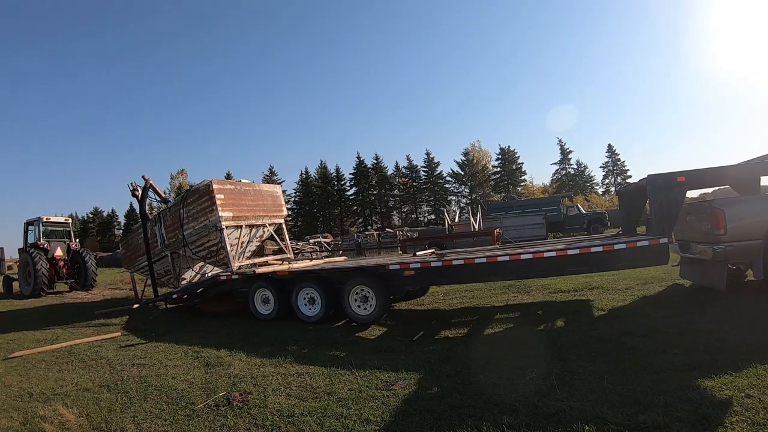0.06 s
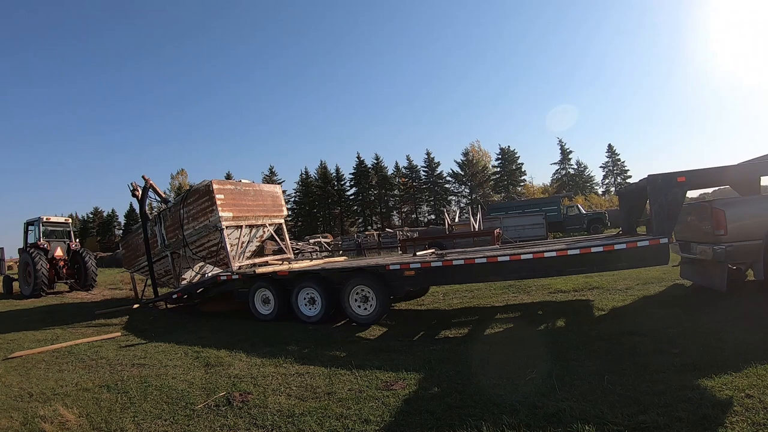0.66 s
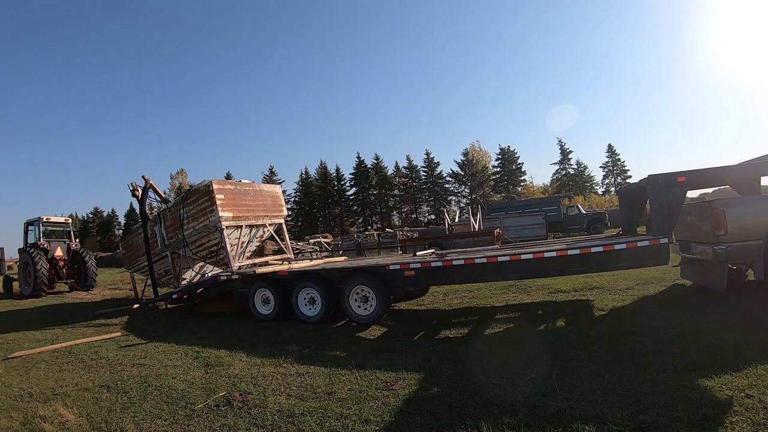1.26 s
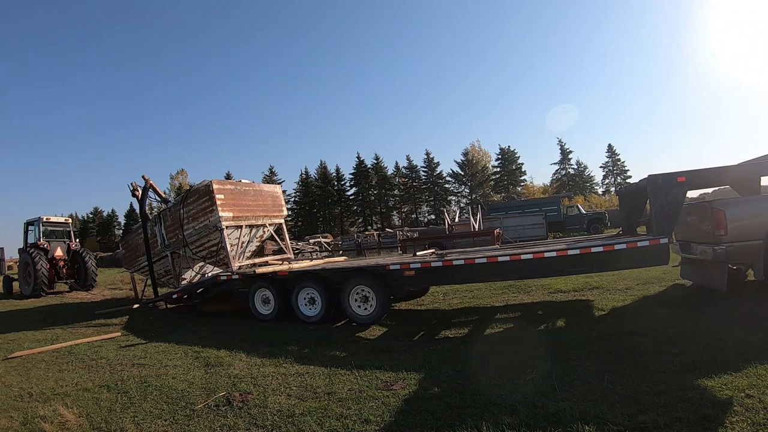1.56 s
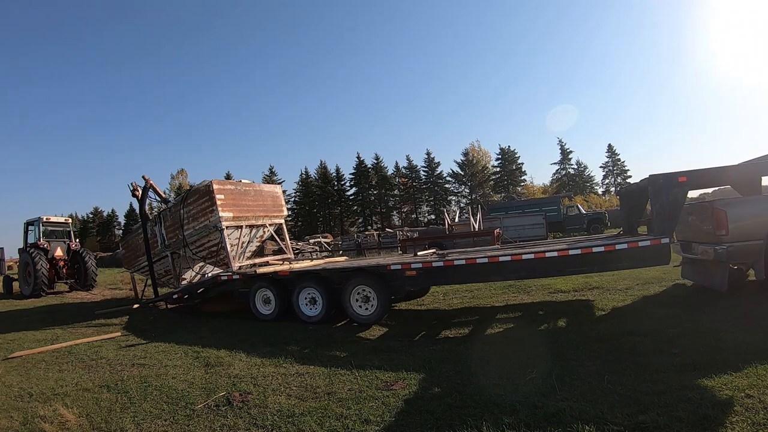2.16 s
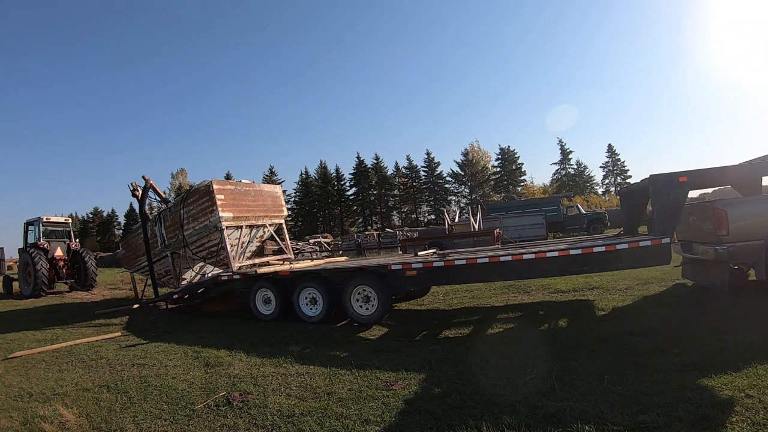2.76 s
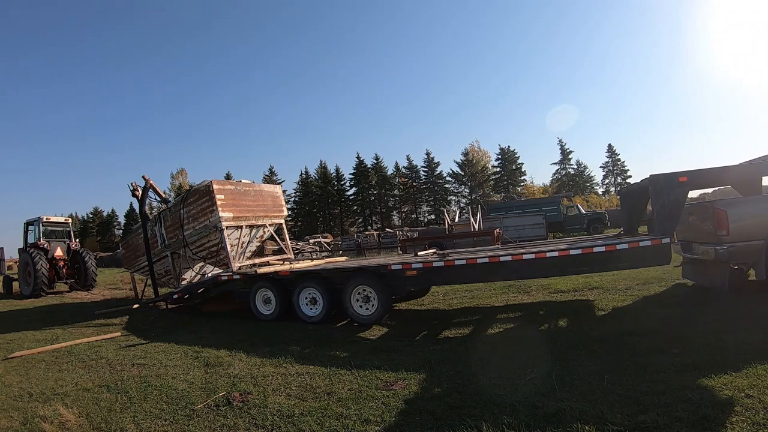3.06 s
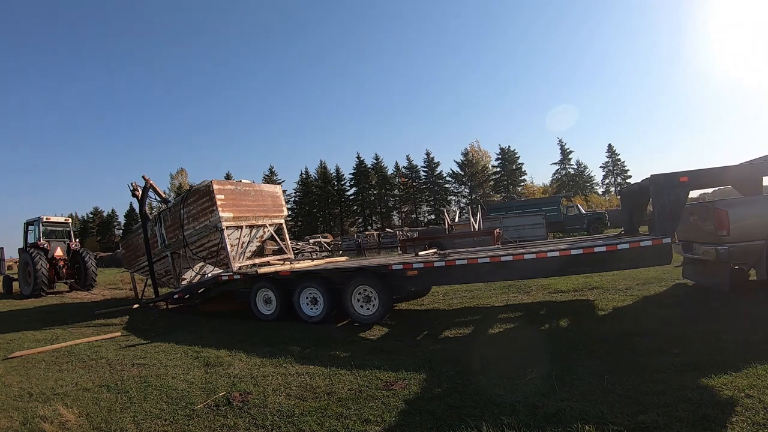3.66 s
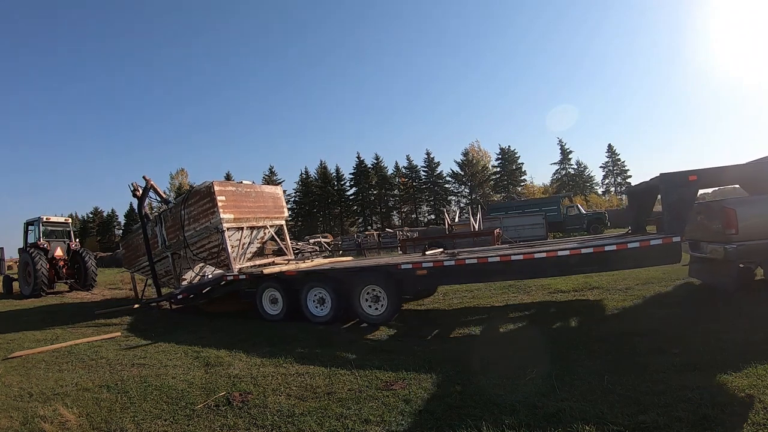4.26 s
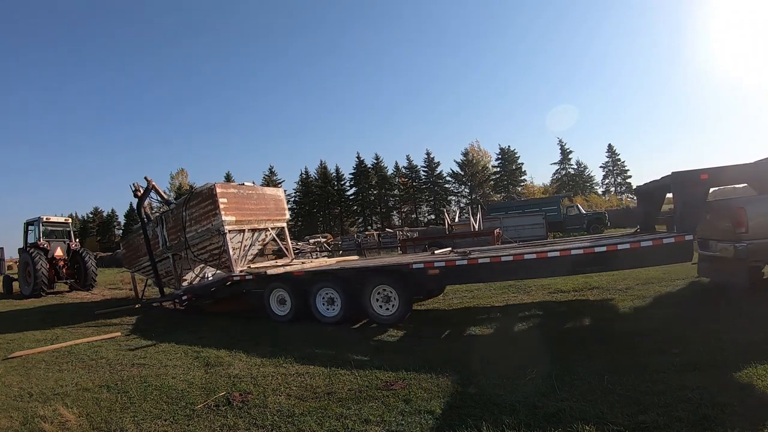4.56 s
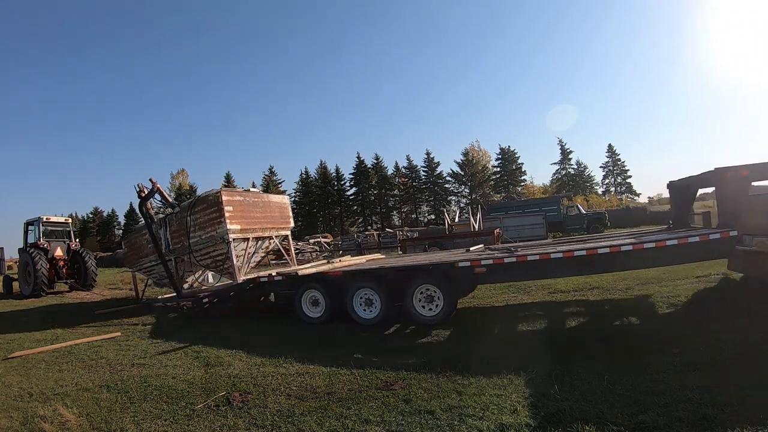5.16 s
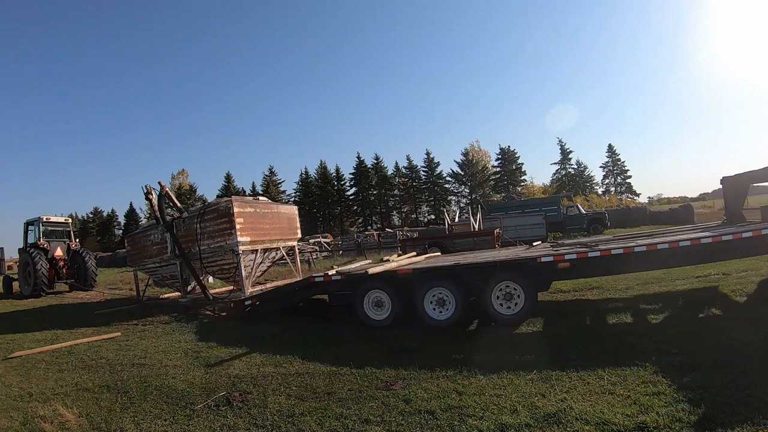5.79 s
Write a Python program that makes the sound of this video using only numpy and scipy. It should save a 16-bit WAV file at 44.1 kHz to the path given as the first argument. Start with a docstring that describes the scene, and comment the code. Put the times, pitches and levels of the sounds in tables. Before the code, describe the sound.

A six-cylinder diesel pickup runs near the microphone in an open farmyard, knocking and rattling its panels over a low rumble. Its pitch climbs steadily for the first four seconds, with a faint hiss of air. A flatbed trailer thumps dully as its load shifts, hardest at about 1.2 to 1.5 seconds, and wooden skids crunch briefly near 0.3, 2 and 3.6 seconds. From about 3 seconds the exhaust swells into a deep boom. Just after 4 seconds a wooden tank gives short groans, followed by a quick run of sharp timber knocks and cracks from 4.4 to 4.8 seconds. The engine eases slightly and the boom drops away around 5.2 seconds. The tank then starts scraping down the deck in gritty judders with brief squeals, growing louder with the rumble until the end, near 5.8 seconds.

```python
"""An open farmyard, one microphone near a six-cylinder diesel pickup with a tilted flatbed trailer.
The truck revs up, each cylinder knocking in its own way and rattling the panels, and starts to pull
the trailer out from under a wooden grain tank; the bed thumps and the skids crunch over a low rumble.
From about 3 s the exhaust booms as it takes the load. Past 4 s the tank's timbers groan, knock and
crack, and from 5 s they start to scrape down the deck."""
import sys
import numpy as np
from scipy import signal
from scipy.fft import rfft, irfft, next_fast_len
from scipy.io import wavfile
from scipy.ndimage import uniform_filter1d

SR = 44100
rng = np.random.default_rng(int(sys.argv[2]) if len(sys.argv) > 2 else 0)


def digitize_waveform(pressure):
    """Quantize a signal to 16-bit integers and store it at the path in sys.argv[1].

    Rows of a 2-D input are taken as channels; values are limited to [-1, 1].
    """
    field = np.atleast_2d(pressure).T
    bounded = np.clip(field, -1, 1)
    quanta = np.round(bounded * 32767).astype(np.int16)
    wavfile.write(sys.argv[1], SR, quanta)


N = 257103
TIME = np.arange(N) / SR
TOP_SPEED = 98   # engine speeds are in firings per second throughout

# The cylinders in firing order. Each row: knock at low speed in dB, knock at high speed in dB,
# pitch of its ring as a ratio, delay to the microphone in ms.
CYLINDERS = [(0, -6, 1.03, 0), (-4, 4.5, 1.02, .35), (-6, 1.5, 1.0, .1), (6, 7.5, .995, 0),
             (7.5, 7.5, .985, .2), (2, -.5, .97, .2)]


def exhaust(firings, speed, load_db, pipe_hz=447, pipe_width_hz=32):
    """The firing tone booms from the tailpipe; load brings out overtones and sets the pipe droning."""
    # Overtones, orders that pass through the pipe's resonance, and the burble of free running.
    # Each row: multiple of the firing rate, relative level in dB.
    overtone_orders = [(1.5, -7), (2, -1), (2.5, -11.5), (3, -1.9), (11 / 3, -9), (4, -2), (13 / 3, -10.5),
                       (5, -9)]
    pipe_orders = [(16 / 3, -3), (11 / 2, -0.5), (35 / 6, 0), (20 / 3, 0)]
    burble_orders = [(1.5, -38), (2, -38.5)]

    def orders(table, follows=0, rough=.39):
        """Rough tones locked to the firings; with `follows`, higher ones depend more on the load."""
        out = np.zeros(N)
        for multiple, db in table:
            phase = 2 * np.pi * (multiple * firings + rng.random()) + rough * drift(7)
            gain = from_db(db + follows * (multiple - 1) * load_db)
            out += gain * np.sin(phase) * (1 + rough * drift(28))
        return out

    hauling = ramp(3.15, .15) * (1 - ramp(5.151, .049))   # the stretch in which it booms
    free = from_db(-24 - .13 * (TOP_SPEED - speed) + .31 * load_db)
    boom = from_db(-16 - .5 * (TOP_SPEED - speed))
    level = (1 - hauling) * free + hauling * boom
    lope = 1 + .077 * np.sin(2 * np.pi * firings / len(CYLINDERS))   # once an engine cycle
    tone = level * lope * np.sin(2 * np.pi * firings + .18 * drift(18))
    tone *= from_db(.34 * drift(27))
    overtone_db = -37.5 - .4 * np.maximum(93.8 - speed, 0)
    overtones = from_db(overtone_db) * orders(overtone_orders, follows=.25)
    drone = from_db(-40 + .41 * load_db) * resonate(orders(pipe_orders), pipe_hz, pipe_width_hz)
    burble = (1 - hauling) * orders(burble_orders)
    return np.sqrt(2) * (tone + overtones + drone + burble)


def diesel(firings, speed, load_db, low_speed=68, high_speed=78, jitter_s=.00005, burn_s=.0016):
    """Each firing is a sharp blow, then a moment of rough burning; it knocks and shakes the engine."""
    count = np.floor(firings - .08).astype(int)
    cylinder = count % len(CYLINDERS)
    slow_db, fast_db, pitch, delay_ms = np.array(CYLINDERS)[cylinder].T
    revved = np.clip((speed - low_speed) / (high_speed - low_speed), 0, 1)
    blow_db = slow_db + revved * (fast_db - slow_db)
    fired = np.flatnonzero(np.diff(count)) + 1
    late, uneven_db = rng.standard_normal((len(fired), 2)).T
    delay_s = delay_ms[fired] / 1000 + jitter_s * late
    arrivals = np.clip(fired + (delay_s * SR).astype(int), 0, N - 1)
    blows, shakes = np.zeros((2, N))
    blows[arrivals] = from_db(blow_db[fired] + uneven_db)
    shakes[fired] = blows[arrivals] ** .25   # far more even than the blows
    burning = signal.lfilter([1], [1, -np.exp(-1 / (burn_s * SR))], blows)
    force = blows + .05 * burning * rng.standard_normal(N)
    throb = 1 + .027 * unit(burning)
    return (block_knock(force, pitch, speed, load_db)
            + clatter(rattle(shakes, cylinder), throb, load_db)
            + injectors(rattle(shakes, cylinder), firings)
            + fan_and_intake(throb))


def block_knock(force, pitch, speed, load_db, hot_speed=81, hood_hz=4000):
    """Combustion rings the block and the bay under the hood; a hotter burn rings the block higher."""
    # Modes of the block (before each cylinder's pitch and the heat shift them) and of the engine bay.
    # Each row: frequency in Hz, width in Hz, relative level in dB.
    block_modes = [(843, 36, -4.5), (894.6, 33, 10), (988, 40, -2), (1240, 42, -13.5), (1365, 38, -14.5),
                   (1875, 71, -16.5), (2280, 110, -24.5), (3050, 140, -19.5)]
    bay_modes = [(365, 35, -15), (449, 20, -3), (727, 24, -8), (806, 20, -1.5)]
    heat = 1 + .0036 * np.maximum(speed - hot_speed, 0)
    ring = np.zeros(N)
    for modes, tuning in (block_modes, pitch * heat), (bay_modes, 1):
        for k, (hz, width, db) in enumerate(modes):
            ring += (-1) ** k * from_db(db) * resonate(force, hz * tuning, width)
    muffled = steadied(soften(ring, hood_hz), hz=4.9)
    return from_db(-32.5 + load_db) * unit(muffled, band=(780, 1050))


def rattle(shakes, cylinder, length_s=.024, alike=.75):
    """Each cylinder shakes its own parts: a burst that is much the same every time it fires."""
    size = int(length_s * SR)
    bursts = rng.standard_normal((len(CYLINDERS), size)) * np.exp(-np.arange(size) / size)
    own = sum(signal.oaconvolve(shakes * (cylinder == k), burst)[:N] for k, burst in enumerate(bursts))
    return np.sqrt(alike) * unit(own) + np.sqrt(1 - alike) * rng.standard_normal(N)


def clatter(rattling, throb, load_db):
    """Shaken parts clatter and ring the covers and panels, following part of the load's swing."""
    # The clatter's colour. Each row: frequency in Hz, density in dB.
    spectrum = [(100, -27.5), (250, -10.5), (400, 1), (600, -6), (850, 5.5), (1130, -4.5), (1420, 2),
                (1650, -1.5), (1900, -0.5), (2550, -8.5), (3050, -11), (3700, -39.5), (6000, -41),
                (12000, -100)]
    # Ringing covers and panels. Each row: frequency in Hz, width in Hz, relative level in dB.
    panel_modes = [(1222, 73, -1), (1409, 70, 1.5), (1855, 110, -5.5), (2267, 27, -1.5), (2560, 27, -8),
                   (3087, 41, -7), (3830, 44, -10), (4440, 24, -5), (4586, 37, -9), (5000, 22, -13)]
    shaking = steadied(rattling, hz=16) * throb
    parts = unit(colour(shaking, spectrum), band=(1200, 2800))
    ring = sum(from_db(db) * resonate(shaking, hz, width) for hz, width, db in panel_modes)
    panels = unit(soften(ring, 5150, order=8))
    return from_db(.43 * load_db) * (from_db(-37) * parts + from_db(-41.5) * panels)


def injectors(rattling, firings, pulse_depth=.3):
    """The injectors rasp in pulses, one a firing, loudest as the truck takes the weight."""
    # The rasp's course. Each row: time in seconds, level in dB.
    strain = [(0.3, -56), (.95, -41), (1.5, -42), (1.95, -43), (2.35, -54), (2.65, -40), (3.0, -40),
              (3.27, -36.5), (3.6, -38), (3.8, -41), (4.3, -42), (4.85, -60.5)]
    # Its colour. Each row: frequency in Hz, density in dB.
    spectrum = [(900, -44), (1700, -5), (2300, 2.5), (2800, -1.5), (3500, -21), (5000, -28), (6000, -55),
                (12000, -86)]
    strain_db, = in_time(strain)
    spray = steadied(rattling, hz=11) * (1 + pulse_depth * np.cos(2 * np.pi * firings))
    return from_db(strain_db) * unit(colour(spray, spectrum))


def fan_and_intake(throb):
    """Air hisses through the fan and intake, throbbing slightly with the firings."""
    # The airflow. Each row: time in seconds, level in dB.
    airflow = [(0, -51), (.6, -52.5), (1, -45.5), (2.3, -45.5), (3.3, -42), (4.6, -48), (4.9, -54)]
    # The colour of its hiss. Each row: frequency in Hz, density in dB.
    spectrum = [(1000, -50.5), (1800, -17), (3000, 9), (3650, 3), (4200, 4.5), (4550, 6), (4900, -4),
                (5300, -18.5), (5800, -35.5), (9000, -50), (15000, -76.5)]
    air_db, = in_time(airflow)
    return from_db(air_db) * unit(noise(spectrum, throb), band=(3300, 5000))


def turbo(speed, lag_s=.3, hz_per_speed=103, waver_hz=45):
    """Air rushes through the turbocharger; its faint whistle follows the engine's speed late."""
    # The rush of air. Each row: time in seconds, level in dB.
    rush = [(0.15, -73.5), (.5, -72), (1.1, -68.5), (1.5, -71.5), (2.4, -67), (3.3, -66), (4.0, -64.5),
            (4.6, -65.5), (4.95, -69.5)]
    # Its colour. Each row: frequency in Hz, density in dB.
    spectrum = [(3000, -17), (5500, -0.5), (7000, -1), (8400, 1), (9300, -12.5), (10200, -18), (15000, -32)]
    boost = np.interp(TIME - lag_s, TIME, speed)
    whistle_db = -86 - .7 * (TOP_SPEED - boost) + 1.5 * drift(15)
    whistle_hz = hz_per_speed * boost + waver_hz * drift(60)
    whistle = from_db(whistle_db) * np.sin(2 * np.pi * np.cumsum(whistle_hz) / SR)
    rush_db, = in_time(rush)
    return whistle + from_db(rush_db) * unit(noise(spectrum))


def timber_knocks(grit=.47):
    """A timber drops with a short gritty contact; where it lands decides which modes ring most. The first two
    rows instead give the skids' jerks a bright crack."""
    # Landings on the deck; the first two rows are bright cracks within the skids' jerks. Each row: start in
    # seconds, # peak in dB, length of contact in seconds, centre of the ring in Hz, its spread as a ratio.
    landings = [(.286, -20.5, .08, 2900, 1.7), (3.597, -24.5, .06, 3170, 1.23),
                (4.43, -10.5, 0.032, 1140, 1.7), (4.502, -14.5, 0.056, 930, 1.74),
                (4.51, -16.5, 0.072, 1070, 1.34), (4.585, -17.5, 0.017, 1440, 1.5),
                (4.587, -17.5, 0.009, 2900, 1.67), (4.676, -16.5, 0.04, 800, 1.3),
                (4.682, -15, 0.05, 884, 1.56), (4.774, -19, 0.033, 1550, 1.1),
                (4.782, -5.5, 0.024, 1600, 1.24), (4.783, -20, 0.043, 3120, 1.5),
                (4.785, -13, 0.04, 730, 1.43), (4.794, -18, 0.04, 1100, 1.9),
                (4.807, -15.5, 0.033, 855, 1.5), (4.822, -23, 0.24, 740, 1.35)]
    # The timbers' modes. Each row: frequency in Hz, relative level in dB, t60 in seconds.
    modes = [(534, -12.5, 0.058), (618, -9.5, .06), (763, -8.5, 0.049), (868, -9, 0.06),
             (1060, -5.5, 0.026), (1290, -5.5, 0.021), (1460, -8, 0.021), (1565, -7, 0.03),
             (1756, -8.5, 0.027), (2160, -17, 0.0085), (2550, -13, 0.0097), (3370, -12.5, 0.0061)]
    out, age = np.zeros(N), TIME[:SR // 2]
    for start, peak_db, contact_s, centre_hz, spread in landings:
        contact = grit * decay(start, contact_s) * rng.standard_normal(N)
        contact[round(start * SR)] += 1
        ring = np.zeros_like(age)
        for k, (hz, db, t60) in enumerate(modes):
            detuned_hz = hz * (1 + .015 * rng.standard_normal())
            ring += (-1) ** k * from_db(db - 60 * age / t60) * np.sin(2 * np.pi * detuned_hz * age)
        struck = signal.oaconvolve(contact, ring)[:N]
        blow = bandpass(struck, (centre_hz / spread, centre_hz * spread), order=2)
        out += from_db(peak_db) * blow / np.abs(blow).max()
    return out


def wood_cracks(snap_loss_db=2):
    """Strained fibres snap: bright bursts that are gone at once, each of a run weaker than the last."""
    # Runs of snaps. Each row: start in seconds, level in dB, t60 in seconds, snaps, gap in seconds.
    runs = [(4.44, -20.5, 0.048, 1, .01), (4.507, -27, .025, 2, 0.018), (4.585, -19, 0.087, 1, .01),
            (4.643, -23, 0.03, 3, 0.0075), (4.683, -23.5, 0.035, 5, 0.013)]
    # A snap's colour. Each row: frequency in Hz, density in dB.
    spectrum = [(400, -10.5), (1200, 1.5), (2500, -3.5), (4500, -1.5), (5500, -13.5), (7000, -18.5),
                (9000, -28), (10500, -33), (13000, -42), (16000, -70)]
    envelope = sum(from_db(db - snap_loss_db * k) * decay(start + gap_s * k, t60)
                   for start, db, t60, snaps, gap_s in runs for k in range(round(snaps)))
    return noise(spectrum, envelope)


def skid_slips(rise_s=.005):
    """The tank's skids jerk a little way, crunching in a swell of splintery grains."""
    # The jerks. Each row: start in seconds, relative level in dB, t60 in seconds, brightness in Hz.
    jerks = [(0.28, -17.5, 0.18, 4480), (1.795, -21, 0.25, 3470), (2.079, -20, 0.13, 2480),
             (2.247, -21, 0.098, 5500), (3.588, -16.5, 0.14, 3900), (4.391, -21.5, 0.17, 3620),
             (5.197, -17.5, 0.17, 9100), (5.223, -17, 0.12, 4440), (5.493, -15.5, 0.23, 8200),
             (5.567, -28, 0.064, 8150), (5.632, -23.5, 0.13, 6000), (5.692, -22, 0.069, 6060)]
    # The crunch's colour. Each row: frequency in Hz, density in dB.
    spectrum = [(300, -21), (700, 7), (1200, 5), (2400, 1), (4000, -0.5), (4800, -5.5), (5600, -17.5),
                (7000, -17.5), (9200, -24.5), (10200, -36.5), (12500, -38), (16000, -72)]
    splinters = grains(per_s=8200, spread_db=1.5)
    crunch = sum(from_db(db) * soften(splinters * ramp(start, rise_s) * decay(start, t60), hz)
                 for start, db, t60, hz in jerks)
    return colour(crunch, spectrum)


def tank_slide(rise_s=.05, judder_db=1.0):
    """The skids drag down the deck in judders: boards groan and grit rasps."""
    # The slide's course. Each row: time in seconds, groan in dB, rasp in dB.
    course = [(5.08, -70, -61), (5.15, -45, -42), (5.27, -42, -41), (5.43, -36.5, -44), (5.53, -27.5, -39),
              (5.62, -33, -36.5), (5.71, -31.5, -31.5), (5.77, -20, -24), (5.83, -20.5, -23.5)]
    # Colours of the boards and the grit. Each row: frequency in Hz, density in dB.
    groan_spectrum = [(40, -15), (120, 0), (200, 2), (330, -1.5), (440, 1.5), (600, 0), (830, 1), (1200, 1),
                      (1800, -25), (2800, -26), (5000, -36), (10000, -93)]
    rasp_spectrum = [(900, 2.5), (1800, 5.5), (2600, 1), (3300, 1), (4400, 0.5), (5000, -13), (5700, -19),
                     (9000, -26.5), (10200, -36), (12500, -39), (16000, -72)]
    groan_db, rasp_db = in_time(course)
    drag = ramp(course[0][0], rise_s) * from_db(judder_db * drift(54))
    groan = from_db(groan_db) * unit(colour(grains(per_s=1200, spread_db=0), groan_spectrum))
    rasp = from_db(rasp_db) * unit(colour(grains(per_s=6100, spread_db=-1), rasp_spectrum))
    return drag * (groan + rasp)


def skid_squeals(waver=.011):
    """Brief unsteady tones where the skids stick and slip on steel."""
    # Groans and squeals. Each row: middle in seconds, length in seconds, pitch in Hz, peak in dB.
    squeals = [(4.114, .035, 407, -25.5), (4.19, 0.074, 433, -30.5), (4.303, .06, 429, -33.5),
               (5.048, 0.023, 6750, -65), (5.38, 0.025, 7050, -56), (5.37, 0.037, 8700, -71),
               (5.542, 0.07, 771, -27.5), (5.801, 0.01, 3114, -22.5), (5.813, .007, 3205, -21),
               (5.815, .015, 3310, -28)]
    clock = np.cumsum(1 + waver * drift(230)) / SR
    return sum(from_db(db) * swell(middle, length / 2) * np.sin(2 * np.pi * hz * clock)
               for middle, length, hz, db in squeals)


def bed_thumps(rise_s=.0018, lowest_hz=55):
    """The long trailer bed shudders dully as the load shifts; each thump reaches up to its own edge."""
    # The thumps. Each row: start in seconds, level in dB, t60 in seconds, upper edge in Hz.
    thumps = [(.29, -30, 0.41, 302), (1.2, -19, 0.2, 130), (1.23, -14, 0.094, 129),
              (1.259, -9.5, 0.08, 187), (1.268, -24, 0.09, 380), (1.337, -24.5, 0.25, 240),
              (1.389, -21.5, 0.096, 280), (1.532, -14, 0.068, 120), (2.08, -25, 0.29, 543),
              (2.256, -27.5, 0.81, 400), (2.63, -26, .3, 272), (2.741, -22, 0.23, 218),
              (3.17, -29, .25, 302), (4.787, -23.5, 0.17, 410), (5.199, -25.5, 0.25, 287),
              (5.319, -16.5, 0.12, 114)]
    out = np.zeros(N)
    for start, db, t60, top_hz in thumps:
        shudder = steadied(bandpass(rng.standard_normal(N), (lowest_hz, top_hz)), hz=40.3)
        out += from_db(db) * ramp(start, rise_s) * decay(start, t60) * unit(shudder)
    return out


def yard(x, dull_hz=3000):
    """Open air: the direct sound reaches the microphone, then only a few dull echoes."""
    # Echoes off the trailer and sheds. Each row: delay in seconds, level in dB.
    echoes = [(.0087, -11), (.019, -16), (.031, -29.5), (.058, -25), (.11, -23.5)]
    dull = soften(x, dull_hz)
    return x + sum(from_db(db) * np.interp(TIME - delay, TIME, dull, left=0) for delay, db in echoes)


def rumble():
    """Low rumble of the rolling rig and the breeze, swelling and sinking as the rig rocks."""
    # Colours of its deep part and its body. Each row: frequency in Hz, density in dB.
    deep_spectrum = [(4, -47.5), (20, 3), (45, 14.5), (65, 7), (90, 11), (130, -37.5), (1000, -100)]
    body_spectrum = [(30, -24.5), (70, 1.5), (100, 3.5), (135, -1.5), (180, -7.5), (260, -20), (400, -29),
                     (800, -28), (4000, -100)]
    # The rocking. Each row: middle and half length in seconds, deep gain and body gain in dB.
    rocking = [(.3, 0.5, -5, 1), (1.246, 0.18, 6, 4.5), (4.848, 0.5, -3, 4), (5.38, 0.26, 6, 1.5),
               (5.82, 0.14, 10.5, 12.5)]
    deep_db, body_db = sum(np.outer(gains, swell(middle, half)) for middle, half, *gains in rocking)
    deep = unit(steadied(noise(deep_spectrum), hz=2.3), band=(20, 55))
    body = unit(steadied(noise(body_spectrum), hz=9.1), band=(110, 170))
    return from_db(-32 + deep_db) * deep + from_db(-36 + body_db) * body


def from_db(db):
    """Decibels to gain."""
    return 10 ** (np.asarray(db) / 20)


def in_time(rows):
    """Each column of a curve, sample by sample."""
    times, *columns = np.transpose(rows)
    return [np.interp(TIME, times, column) for column in columns]


def ramp(start, length):
    """Straight rise from 0 to 1."""
    return np.clip((TIME - start) / length, 0, 1)


def decay(start, t60):
    """Envelope that jumps to 1 and falls 60 dB in t60 seconds."""
    age = TIME - start
    return (age >= 0) * from_db(-60 * np.clip(age / t60, 0, 4))


def swell(middle, half_length):
    """Bell-shaped envelope with peak 1."""
    return np.exp(-np.minimum(((TIME - middle) / half_length) ** 2, 50))


def unit(x, band=None):
    """Scale to rms 1, overall or within a band in Hz."""
    part = x if band is None else bandpass(x, band)
    return x / (np.std(part) + 1e-12)


def steadied(x, hz):
    """Take the slow swells out of a noise."""
    return x / np.sqrt(uniform_filter1d(x ** 2, int(SR / hz)) / np.mean(x ** 2) + 1e-6)


def soften(x, hz, order=2):
    """Low-pass."""
    return signal.sosfilt(signal.butter(order, hz, fs=SR, output="sos"), x + 1e-18)


def bandpass(x, band, order=4):
    """Keep what lies between two frequencies in Hz."""
    return signal.sosfilt(signal.butter(order, band, "band", fs=SR, output="sos"), x)


def resonate(x, hz, width_hz):
    """One resonance with gain 1 on top; its centre may move."""
    pole = np.exp(-np.pi * width_hz / SR)
    turn = np.exp(2j * np.pi * np.cumsum(hz * np.ones(N)) / SR)
    return 2 * (turn * signal.lfilter([1 - pole], [1, -pole], (x + 1e-18) / turn)).imag


def colour(x, spectrum):
    """Causal (minimum-phase) filter that follows a spectrum."""
    size = 2 * next_fast_len(N // 2 + SR // 8)
    hz, db = np.transpose(spectrum)
    bins_hz = np.maximum(np.arange(size // 2 + 1) * SR / size, 1)
    gain = from_db(np.interp(np.log(bins_hz), np.log(hz), db))
    cepstrum = irfft(np.log(gain))
    response = np.exp(rfft(2 * cepstrum[:size // 2], size) - cepstrum[0])
    return irfft(rfft(x, size) * response)[:N]


def noise(spectrum, envelope=1):
    """White noise under an envelope, then coloured."""
    return colour(envelope * rng.standard_normal(N), spectrum)


def drift(hz):
    """Random wander, mostly slower than hz; rms 1."""
    return unit(soften(rng.standard_normal(N + SR), hz)[SR:])


def grains(per_s, spread_db):
    """Random tiny contacts, uneven in size by spread_db; rms 1."""
    sizes = from_db(spread_db * np.minimum(rng.exponential(1, N), 4)) * rng.choice([-1, 1], N)
    return unit(sizes * (rng.random(N) < per_s / SR))


def scene():
    """Truck, tank, trailer bed and rumble at one microphone."""
    # The engine's speed. Each row: time in seconds, firings per second.
    revs = [(0.0, 55.1), (0.5, 61.66), (0.75, 62.11), (1.1, 67.7), (1.55, 71.01), (2.0, 76.09),
            (2.5, 78.82), (3.0, 82.34), (3.3, 89.4), (3.72, 96.24), (4.0, 98.41), (5.83, 85.09)]
    # How hard it pulls. Each row: time in seconds, load in dB.
    pull = [(0, -16), (.35, -6.5), (1.15, 0), (1.45, -10), (1.7, -6), (1.95, 1), (2.7, -2), (3.3, 0),
            (3.9, -1), (4.35, -9), (5.1, -9.5)]
    speed, = in_time(revs)
    load_db, = in_time(pull)
    firings = np.cumsum(speed) / SR
    truck = exhaust(firings, speed, load_db) + diesel(firings, speed, load_db) + turbo(speed)
    tank = yard(timber_knocks() + wood_cracks() + skid_slips() + tank_slide() + skid_squeals())
    return (truck + tank + bed_thumps() + rumble())[None]


def record(dry, cutoff_hz=15700, fade_s=.002):
    """The highest treble is cut; the sound closes without a click."""
    closing = np.clip((TIME[-1] - TIME) / fade_s, 0, 1)
    return signal.sosfilt(signal.cheby2(12, 70, cutoff_hz, fs=SR, output="sos"), dry * closing)


dry = scene()
out = record(dry)
digitize_waveform(out)
```